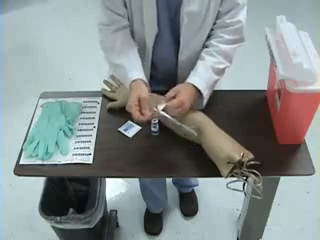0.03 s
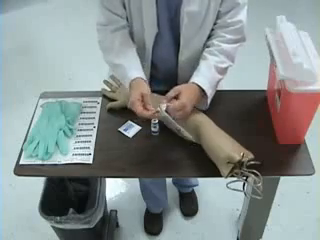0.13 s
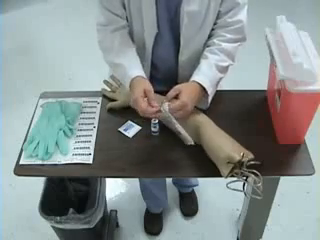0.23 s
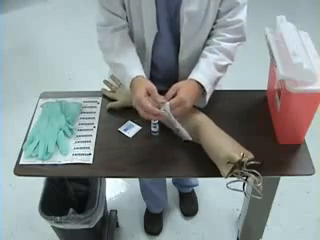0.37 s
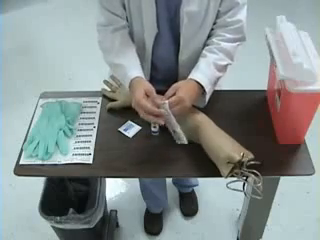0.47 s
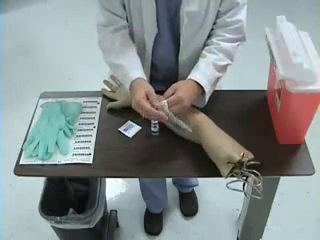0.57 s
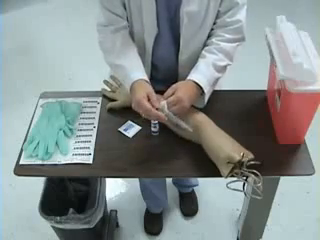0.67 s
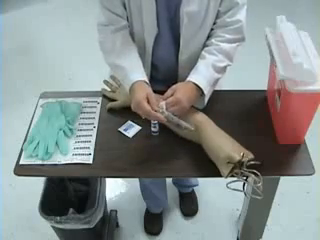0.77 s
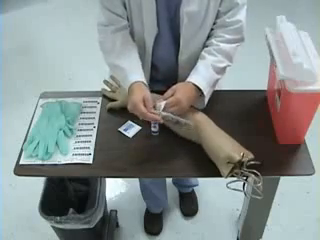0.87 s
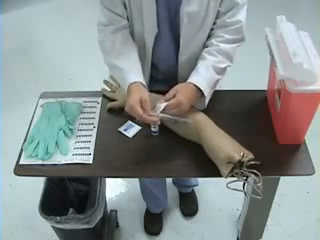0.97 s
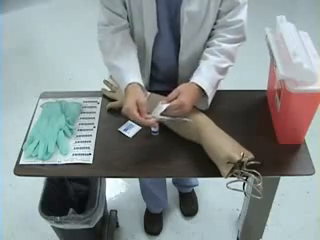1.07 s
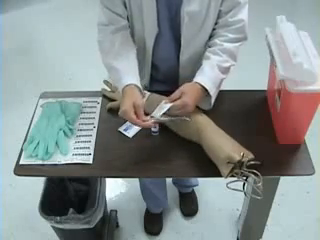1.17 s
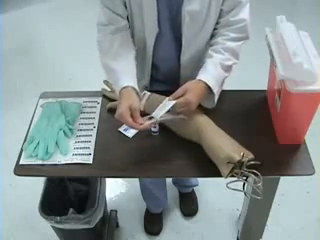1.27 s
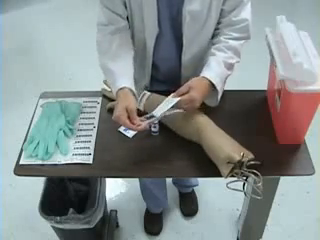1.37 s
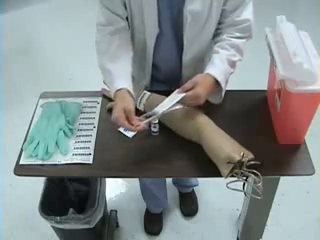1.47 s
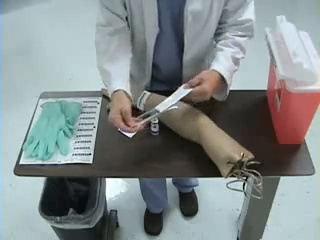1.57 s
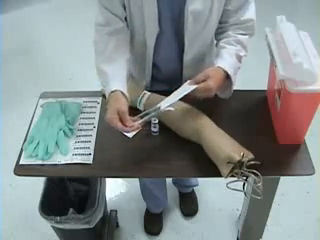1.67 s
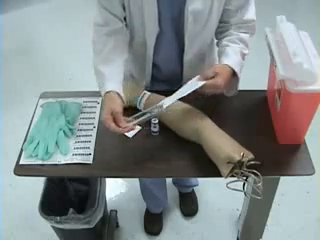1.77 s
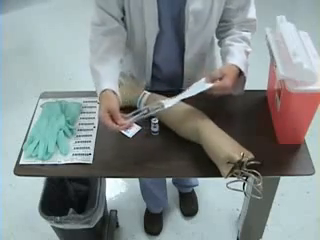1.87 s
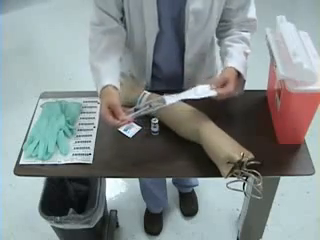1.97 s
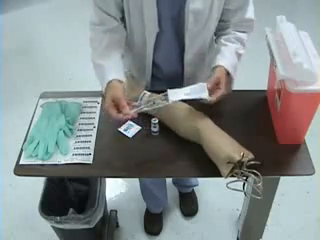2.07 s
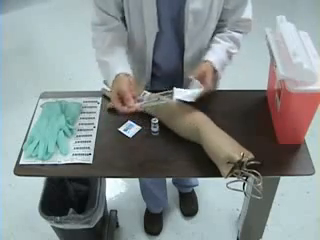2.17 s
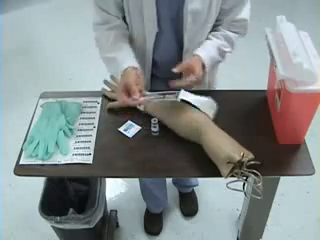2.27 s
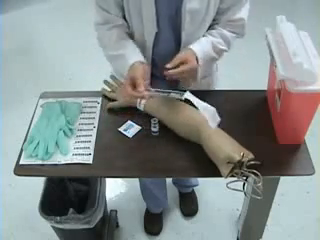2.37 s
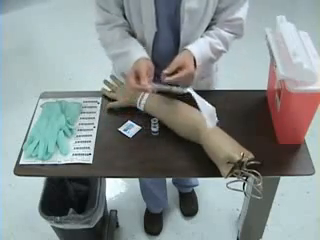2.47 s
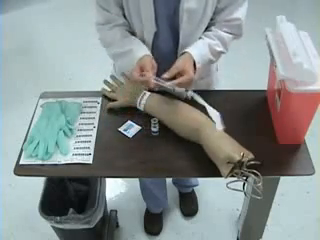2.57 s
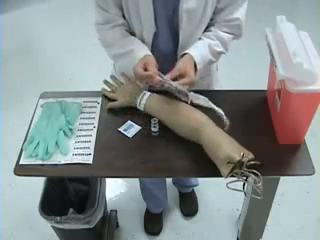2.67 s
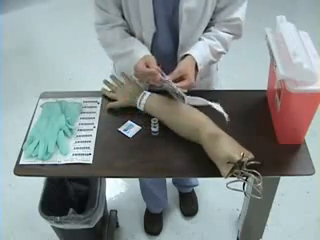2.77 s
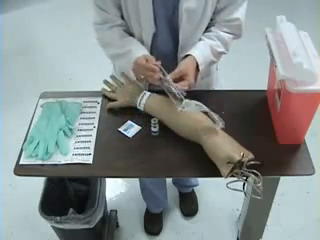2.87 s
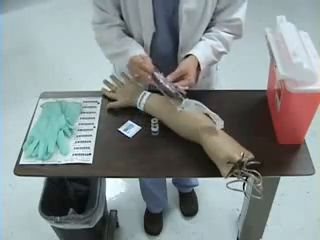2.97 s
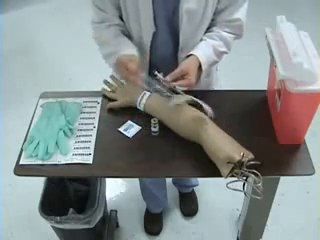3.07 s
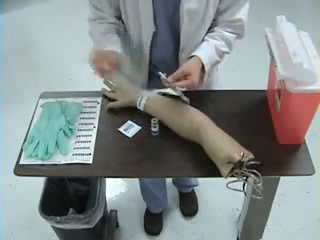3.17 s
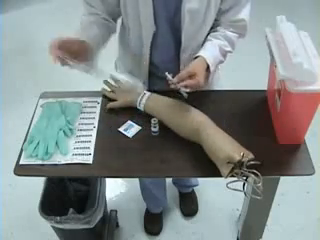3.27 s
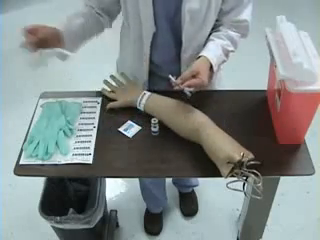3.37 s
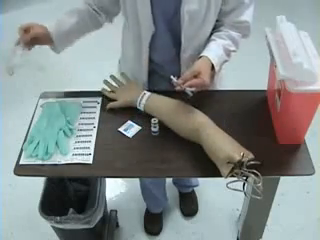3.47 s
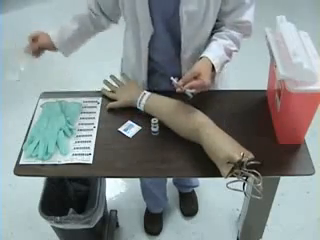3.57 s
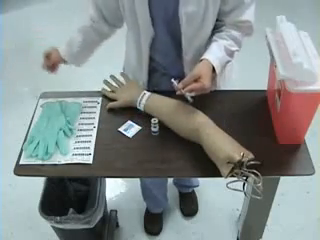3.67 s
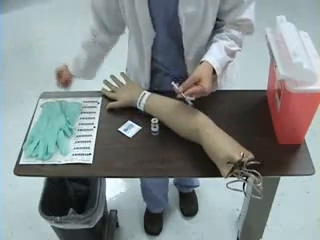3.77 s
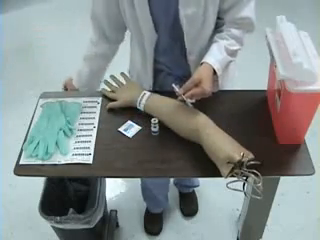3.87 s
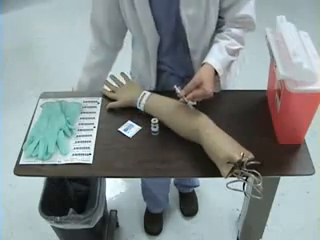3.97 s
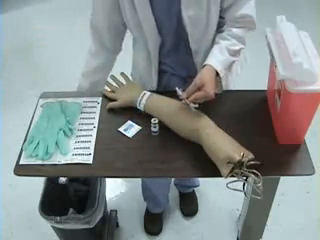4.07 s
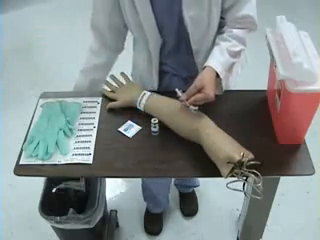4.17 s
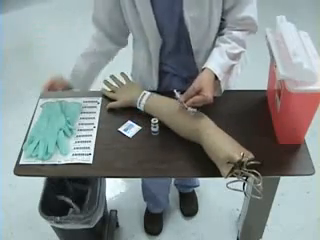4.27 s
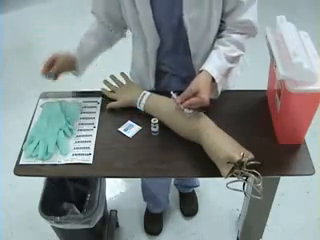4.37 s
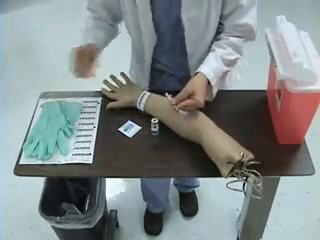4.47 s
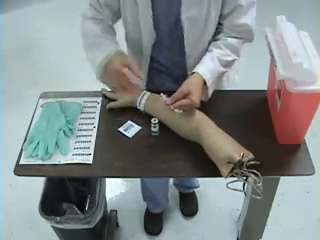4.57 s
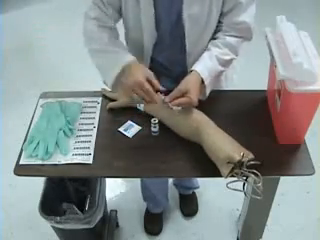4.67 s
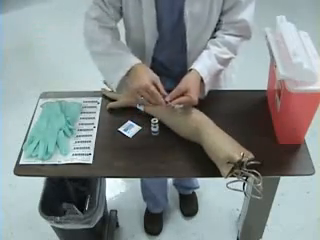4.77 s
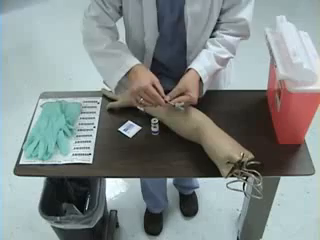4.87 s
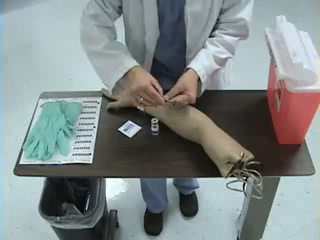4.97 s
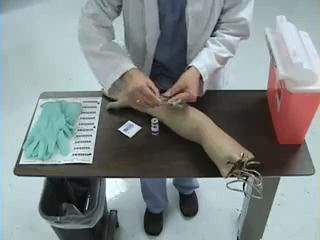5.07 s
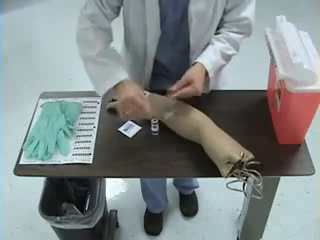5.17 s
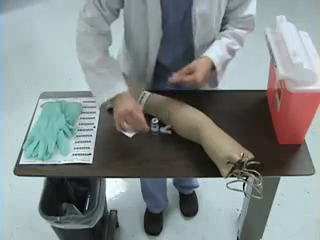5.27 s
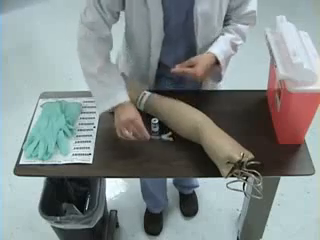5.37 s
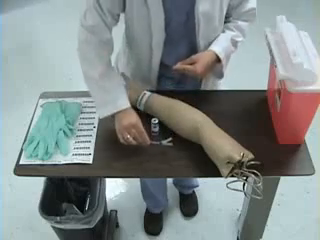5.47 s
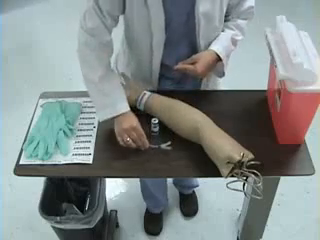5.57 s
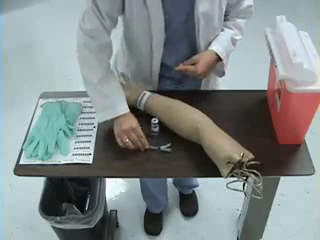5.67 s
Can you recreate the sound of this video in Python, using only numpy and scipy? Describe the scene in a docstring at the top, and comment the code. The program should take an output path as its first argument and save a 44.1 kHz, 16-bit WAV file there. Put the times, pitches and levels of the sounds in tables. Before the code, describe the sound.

Ventilation rumbles and hums quietly in a small room from start to end. Right at the start, close to the microphone, a plastic syringe wrapper crinkles and buckles with sharp snaps, followed by scattered crackles and faint finger rubbing. From about 1 to 2 seconds the paper backing tears off its glued seam in spurts, amid the densest and loudest snaps, with soft puffs of air at about 1.3 and 2 seconds. Quieter rustles, clicks and crinkles continue until roughly 3.7 seconds as the hands handle the pack. Near 4 seconds the empty wrapper gives a small crackle as it is thrown, and at 4.2 seconds it lands lightly in a lined bin, farther off and with more room echo. A sleeve swishes at about 4.5 seconds, then a coat rustles very softly until the end, around 5.7 seconds.

```python
"""Ventilation rumbles and hums in a small room, from start to end. Over a table, hands open a syringe wrapper:
its plastic blister crinkles and buckles in sharp snaps under rubbing fingers. From about 1 to 2 s the paper
backing tears off its glue seam, with two puffs of air. The hands rustle on, and near 4 s the empty wrapper
drops into a lined bin, then swishes along the bin liner. Last, a coat rustles softly."""
import sys
import numpy as np
from scipy import signal
from scipy.fft import rfft, irfft, next_fast_len
from scipy.io import wavfile
from scipy.ndimage import map_coordinates

SR = 44100
rng = np.random.default_rng(int(sys.argv[2]) if len(sys.argv) > 2 else 0)


def int16_out(signal):
    """Quantize to a 16-bit WAV file."""
    q = np.round(np.clip(np.atleast_2d(signal).T, -1, 1) * 32767)
    wavfile.write(sys.argv[1], SR, q.astype(np.int16))


N = 252428
TIME = np.arange(N) / SR


def amp(db):
    """Turn decibels into a multiplier. Table levels are relative; the functions add their own gain."""
    return 10 ** (np.asarray(db) / 20)


def unit(x):
    """Scale x to an average (rms) level of 1."""
    return x / np.sqrt(np.mean(x ** 2) + 1e-20)


def value_at(points, hz):
    """Read between the rows of a (pitch_hz, value) table, on a log pitch scale."""
    pitches, values = np.transpose(points)
    return np.interp(np.log(hz + 1), np.log(pitches + 1), values)


def gains(rows):
    """One volume curve for each level column, fading out just beyond the first and last row."""
    times, *columns = np.transpose(rows)
    fade = np.interp(TIME, [times[0] - .02, times[0], times[-1], times[-1] + .02], [0, 1, 1, 0])
    return [fade * amp(np.interp(TIME, times, db)) for db in columns]


def wobble(per_s):
    """A smooth curve through per_s random values a second."""
    return map_coordinates(rng.standard_normal(int(N * per_s / SR) + 4), [TIME * per_s])


def filtered(x, response):
    """Turn each frequency in x up or down by response(hz)."""
    size = next_fast_len(N + SR // 2)
    return irfft(rfft(x, size) * response(np.fft.rfftfreq(size, 1 / SR)), size)[:N]


def coloured(x, spectrum):
    """Give x the tone colour of a (pitch_hz, level_db) table, at an average level of 1."""
    return unit(filtered(x, lambda hz: amp(value_at(spectrum, hz))))


def band(x, hz, octaves):
    """Keep one broad range of pitches around hz."""
    edges = np.clip([hz * 2 ** (-octaves / 2), hz * 2 ** (octaves / 2)], 50, SR / 2 - 2000)
    return signal.sosfilt(signal.butter(2, edges, "bandpass", fs=SR, output="sos"), x)


def friction(per_s, spread_db, hiss):
    """Tiny slips of uneven size at random moments, over the hiss of smooth sliding."""
    moments = rng.random(N) < per_s / SR
    sizes = amp(spread_db * rng.standard_normal(N).clip(-2, 2))
    return unit(moments * sizes * rng.choice([-1, 1], N)) + hiss * rng.standard_normal(N)


# Echoes off the table, floor and near walls: delay_s, level_db
NEAR_ECHOES = [(.0046, -39), (.0075, -20.5), (0.0147, -17.5), (0.0181, -16.5)]
def near_echoes(x):
    """The direct sound, then weaker copies that bounce off nearby surfaces."""
    out = np.pad(x, (0, SR))
    for delay_s, level_db in NEAR_ECHOES:
        out[round(delay_s * SR):][:N] += amp(level_db) * x
    return out[:N]


# How long the room takes to fade by 60 dB: pitch_hz, fade_s
ROOM_FADE = [(200, 0.32), (1000, 0.46), (3000, 0.3), (7000, 0.32), (10000, 0.24)]
def room_tail(build_s):
    """Countless echoes blur together, build up and die away, lasting longest at middle pitches."""
    hz, t, noise = signal.stft(rng.standard_normal(SR // 2), SR, nperseg=256)
    fade = amp(-60 * t / value_at(ROOM_FADE, hz)[:, None])
    rise = 1 - np.exp(-t / build_s)
    tail = signal.istft(noise * fade * rise, SR, nperseg=256)[1]
    return tail / np.linalg.norm(tail)


def room(source, echo_db, directions=3):
    """Crumpled plastic sounds different in each direction, so the room blends fresh plays of the source."""
    blur = sum(signal.fftconvolve(source(), room_tail(build_s=0.0013))[:N] for _ in range(directions))
    return near_echoes(source()) + amp(echo_db) * blur / np.sqrt(directions)


# Tone colour of the air in the ducts: pitch_hz, level_db
DUCT_COLOUR = [(12, -18), (22, -4), (80, -1), (115, -6.5), (250, -5.5), (340, -11.5), (430, -16.5),
               (590, -16.5), (750, -20), (1000, -22), (1460, -26.5), (2800, -33), (6500, -31.5),
               (10000, -45), (10800, -83)]
# Steady tones of the ventilation and a camera: pitch_hz, level_db
HUM_TONES = [(52, -61), (87.1, -57), (140.9, -65), (177.7, -60), (208.4, -63), (240.2, -64), (301.7, -77.5),
             (474, -70.5), (526, -70.5), (591.5, -70), (948, -74.5), (7880, -76.5)]
def ventilation():
    """Air rumbles in the ducts under a few wavering tones."""
    hum = np.zeros(N)
    for pitch_hz, level_db in HUM_TONES:
        waver_hz = (1.79 + .002 * pitch_hz) * wobble(9)
        phase = 2 * np.pi * np.cumsum(pitch_hz + waver_hz) / SR
        hum += amp(level_db) * np.sqrt(2) * np.sin(phase)
    return amp(-48.5) * coloured(rng.standard_normal(N), DUCT_COLOUR) + hum


# The wrapper slides along the bin liner: time_s, level_db
LINER_SWISH = [(4.43, -76), (4.472, -51.5), (4.49, -36.5), (4.51, -43.5), (4.55, -49), (4.61, -53.5),
               (4.65, -61)]
# The coat shifts as the hands meet and part: time_s, level_db
COAT_MOVES = [(4.68, -64), (4.8, -56), (4.92, -63), (5.1, -95), (5.32, -64), (5.48, -55.5), (5.6, -58),
              (5.72, -61)]
# Tone colours of the sliding liner and of the coat: pitch_hz, level_db
LINER_COLOUR = [(350, -22), (600, -17), (1100, -4.5), (2700, -6.5), (6000, -3), (10000, -8.5)]
COAT_COLOUR = [(350, -26), (800, 3.5), (1800, 1.5), (3500, -3), (6000, -1.5), (10000, -14), (11000, -34)]
def rustles():
    """Surfaces slide over each other: the wrapper swishes once along the bin liner, then the coat rustles
    softly."""
    threads = friction(per_s=2500, spread_db=3, hiss=.8)
    coat_gain = gains(COAT_MOVES)[0] * amp(-4.5 + 1.8 * wobble(16))
    swish = gains(LINER_SWISH)[0] * coloured(threads, LINER_COLOUR)
    return swish + coat_gain * coloured(threads, COAT_COLOUR)


# Fingers rub on the wrapper: time_s, level_db
FINGER_RUBS = [(0.15, -59.5), (0.27, -53.5), (0.5, -62), (0.7, -58.5), (0.98, -60.5), (2.02, -60),
               (2.12, -49), (2.24, -63), (2.33, -56.5), (2.42, -65), (2.77, -57.5), (2.86, -58),
               (3.1, -57.5), (3.5, -60), (3.72, -61), (3.8, -71)]
# Tone colour of the rubbing: pitch_hz, level_db
RUB_COLOUR = [(400, -10), (900, 10), (2100, -1), (3200, 2), (6000, 0), (10000, -11.5), (11000, -37)]
def fingers():
    """Fingers creep over plastic and paper with a faint, uneven crackle."""
    pressure = gains(FINGER_RUBS)[0] * amp(-3.5 + wobble(24.36))
    slips = friction(per_s=500, spread_db=4, hiss=.9)
    return pressure * coloured(slips, RUB_COLOUR)


def finger_ticks(per_s=12, above_rub_db=4, spread_db=6, spread_octaves=0.17):
    """Rows for buckles(): tiny ticks at random moments, louder where the fingers rub harder."""
    times, rub_db = np.transpose(FINGER_RUBS)
    starts = np.linspace(times[0], times[-1], int(per_s * (times[-1] - times[0])))
    shift, pitch, size = rng.uniform(-1, 1, (len(starts), 3)).T
    starts = np.clip(starts + shift / per_s, times[0], times[-1])
    levels = np.interp(starts, times, rub_db) + above_rub_db + spread_db * size
    pitches = PANEL_HZ * 2 ** (spread_octaves * pitch)
    return [(start_s, hz, db, -3) for start_s, hz, db in zip(starts, pitches, levels)]


# The wrapper is flicked away and lands: start_s, pitch_hz, level_db, crease_above_panel_db
BIN_HITS = [(3.9646, 2600, -41.5, -5), (4.2035, 2900, -42.5, 0), (4.208, 3330, -39, 0.5)]
def bin_drop():
    """The empty wrapper buckles once as it is thrown and twice as it lands in the bin."""
    return buckles(BIN_HITS)


# The seam gives way all at once: start_s, level_db
AIR_PUFFS = [(1.2635, -31), (1.9918, -27.5)]
def puffs(rise_s=0.00094):
    """The pack gives a soft push of air, too short to ring."""
    out = np.zeros(N)
    age = np.arange(SR // 30) / SR / rise_s
    for start_s, level_db in AIR_PUFFS:
        out[round(start_s * SR):][:len(age)] += amp(level_db) * age * np.exp(1 - age)
    return out


# The paper leaves the seam: time_s, paper_level_db, glue_level_db
PEEL_LEVELS = [(1.1, -78, -41), (1.168, -67, -42), (1.276, -65, -57), (1.39, -52.5, -35),
               (1.526, -63.5, -48), (1.756, -49, -44), (1.888, -66, -44), (1.966, -48.5, -30.5),
               (2.06, -56.5, -69)]
# Tone colours of the drumming paper and of the tearing glue: pitch_hz, level_db
PAPER_COLOUR = [(200, -27), (380, -15), (540, 6.5), (750, -2.5), (1000, 2), (1400, -12.5), (2200, -17),
                (5000, -68)]
GLUE_COLOUR = [(600, -52), (1500, -2.5), (3000, -4), (5000, -0.5), (7300, -12), (10000, -16)]
def peel():
    """Threads of glue let go one by one, in spurts, and drum on the tight paper."""
    paper_gain, glue_gain = gains(PEEL_LEVELS)
    spurts = friction(per_s=2500, spread_db=3, hiss=.6) * amp(3.5 * wobble(45.25))
    drumming = amp(3.5) * paper_gain * coloured(spurts, PAPER_COLOUR)
    tearing = amp(-9) * glue_gain * coloured(spurts, GLUE_COLOUR)
    return drumming + tearing


# The plastic crumples softly: middle_s, half_length_s, pitch_hz, level_db
SOFT_CRINKLES = [(0.035, 0.011, 4200, -31), (0.069, 0.019, 2320, -42.5), (0.413, .008, 4640, -39),
                 (1.059, 0.014, 3800, -42.5), (3.137, 0.011, 6500, -53.5), (3.319, 0.0071, 3500, -53.5),
                 (3.37, 0.015, 3560, -52.5), (3.62, 0.015, 2850, -55)]
def crinkles():
    """Many small creases of very uneven size shift together in a short swell."""
    out = np.zeros(N + SR)
    t = np.arange(-SR // 32, SR // 16) / SR
    for middle_s, half_length_s, pitch_hz, level_db in SOFT_CRINKLES:
        slips = rng.standard_normal(len(t)) * amp(9.5 * rng.standard_normal(len(t)).clip(-2, 2))
        swell = amp(level_db) * np.exp(-(t / half_length_s) ** 2 / 2)
        start = max(0, round((middle_s + t[0]) * SR))
        out[start:][:len(t)] += swell * unit(band(slips, pitch_hz, octaves=1.74))
    return out[:N]


def pop(t, hz, octaves, fade_s):
    """A patch of plastic creaks, gives way at t = 0 and rattles around one pitch."""
    shape = np.where(t < 0, amp(-16.5 + 60 * t / 0.014), amp(-60 * t / fade_s))
    ring = band(rng.choice([-1, 1], len(t)) * shape, hz, octaves)
    return ring * np.sqrt(.003 * SR / np.sum(ring ** 2))  # as much energy as 3 ms at level 1


PANEL_HZ, CREASE_HZ = 3450, 5850  # a typical panel (a flat patch of the blister) and its crease
TAUT_FROM_S, TAUT_TO_S, TAUT_DB = 1.5, 2.0, 6  # while the pack is pulled tight, buckles thud harder
def buckles(rows):
    """Each buckle thuds through the whole pack, rings one panel and cracks along a crease."""
    out = np.zeros(N + SR)
    t = np.arange(-SR // 150, SR // 50) / SR
    for start_s, pitch_hz, level_db, crease_db in rows:
        thud_db = -21 - 0.33 * level_db - 0.22 * crease_db  # loud, sharp snaps have a smaller share of thud
        thud_db += TAUT_DB * (TAUT_FROM_S < start_s < TAUT_TO_S)
        crease_hz = CREASE_HZ * (pitch_hz / PANEL_HZ) ** 0.41  # smaller panel: shorter, higher crease
        thud = amp(thud_db) * pop(t, 970, octaves=2.67, fade_s=0.033)
        panel = pop(t, pitch_hz, octaves=0.83, fade_s=0.01)
        crease = amp(crease_db) * pop(t, crease_hz, octaves=0.75, fade_s=0.0081)
        out[round((start_s + t[0]) * SR):][:len(t)] += amp(level_db + 0.82) * (thud + panel + crease)
    return out[:N]


# The blister snaps: start_s, pitch_hz, level_db, crease_above_panel_db
BLISTER_SNAPS = [(0.021, 3550, -24.5, 4), (0.0254, 3440, -25, -1), (0.0489, 2200, -31, -20),
                 (0.0627, 2700, -31, -15), (0.067, 2300, -33.5, -1), (0.1644, 3980, -49, 4),
                 (0.232, 3500, -47, 3), (0.3988, 3480, -34.5, 6), (0.4292, 3050, -27, -1),
                 (0.552, 2600, -43.5, -3), (0.5664, 3670, -35.5, 0.5), (0.6475, 3300, -43, -1),
                 (0.7632, 2900, -47, -9), (0.8144, 3900, -42.5, 3), (0.939, 3300, -38.5, 0),
                 (0.9947, 2680, -37, -1), (1.0028, 2440, -28, -12), (1.0406, 3340, -30, 1),
                 (1.0806, 2640, -19, -9.5), (1.184, 3180, -39.5, 3.5), (1.2121, 3500, -26, -1),
                 (1.2345, 3800, -44.5, 11), (1.2631, 3700, -20, 1.5), (1.3, 4370, -27.5, -3),
                 (1.3277, 4000, -22.5, -0.5), (1.3688, 3300, -34, -6), (1.3946, 2960, -39.5, 10),
                 (1.425, 3820, -25.5, -3.5), (1.4576, 3660, -31, -2), (1.4673, 3160, -24.5, -2.5),
                 (1.4802, 3400, -27.5, 5), (1.543, 2700, -44, 6.5), (1.7098, 3130, -35, 3.5),
                 (1.7477, 3500, -33.5, -10.5), (1.7947, 3400, -21.5, -4.5), (1.8642, 5200, -50.5, 10),
                 (1.905, 3900, -41, -3), (1.9426, 5000, -35.5, 7.5), (1.9849, 3800, -27, -9),
                 (1.9908, 3960, -21, 4), (2.0926, 2600, -41, -7), (2.0984, 3700, -45, 3),
                 (2.1185, 3000, -49, 10), (2.1757, 3700, -40.5, -5.5), (2.1877, 2440, -43.5, 1),
                 (2.288, 4320, -34, -14), (2.7762, 3700, -53, 1), (2.7862, 2550, -46, 0.5),
                 (2.8643, 3380, -35.5, 1), (2.9516, 3500, -37.5, 0.5), (3.0125, 2320, -39.5, 0),
                 (3.1211, 5600, -46.5, 5.5), (3.4856, 5600, -56.5, 6)]
def blister():
    """The plastic blister bends in the hands, with sharp snaps and softer crinkles."""
    return buckles(BLISTER_SNAPS) + crinkles()


def scene():
    """The hands are close by; the bin stands lower and farther off, so it has more room echo."""
    plastic = room(blister, echo_db=-11)
    paper_and_cloth = room(lambda: peel() + puffs() + fingers() + rustles(), echo_db=-10, directions=1)
    far_bin = room(bin_drop, echo_db=-4.5)
    ticks = finger_ticks()
    crackle = room(lambda: buckles(ticks), echo_db=-12, directions=1)
    return (plastic + paper_and_cloth + far_bin + crackle + ventilation())[None]


# How much each part of the treble is lifted or lowered: pitch_hz, gain_db
TREBLE_COLOUR = [(1500, 0), (1900, 1.5), (2400, 0.5), (3000, 0.5), (3650, -1.5), (4300, -1.5), (5600, -3),
                 (6500, -4.5), (7150, -1), (7700, -0.5), (8500, 2.5), (9200, 1.5), (10200, -3),
                 (10750, -26), (12200, -20)]
TOP_HZ = 12600  # everything higher is cut away
def record(dry):
    """The treble is gently lifted and lowered, then falls away steeply above about 10 kHz."""
    heard = filtered(dry[0], lambda hz: amp(value_at(TREBLE_COLOUR, hz)))
    return filtered(heard, lambda hz: 1 / np.sqrt(1 + (hz / TOP_HZ) ** 80))[None]


dry = scene()
out = record(dry)
int16_out(out)
```